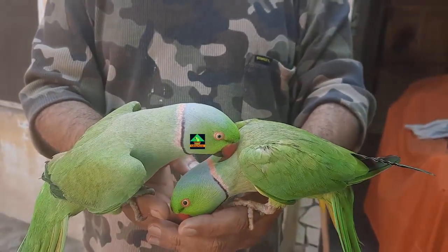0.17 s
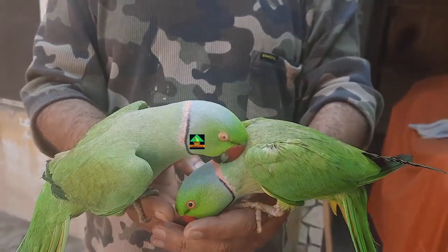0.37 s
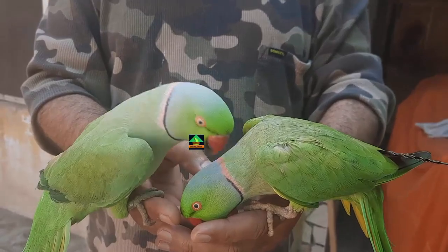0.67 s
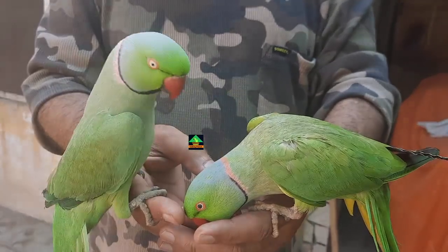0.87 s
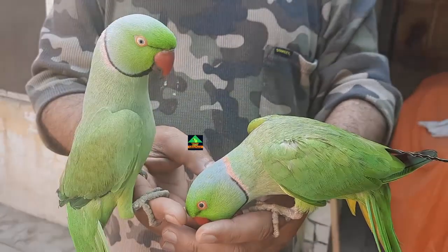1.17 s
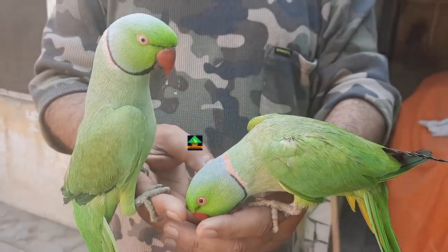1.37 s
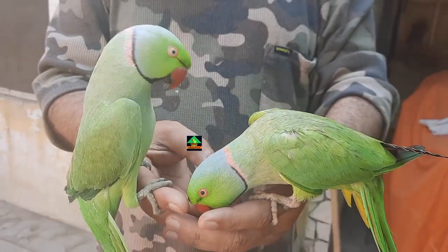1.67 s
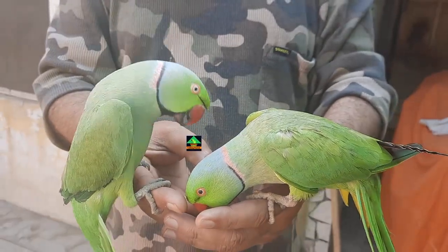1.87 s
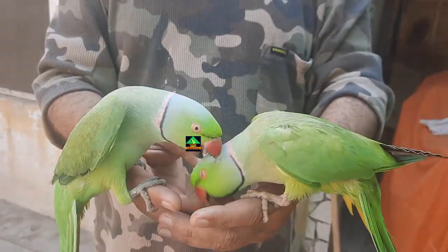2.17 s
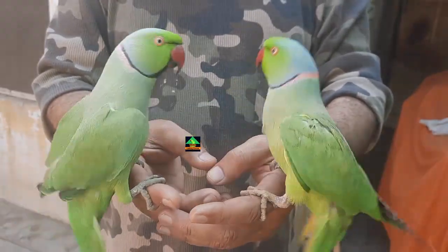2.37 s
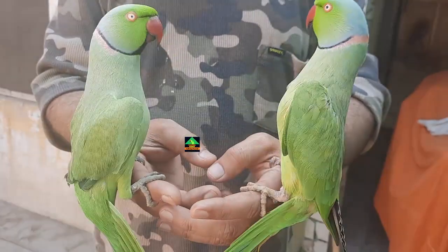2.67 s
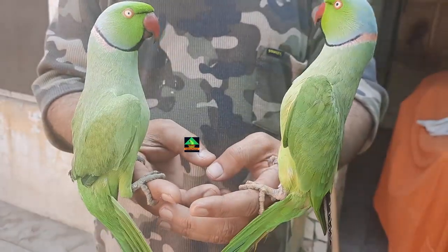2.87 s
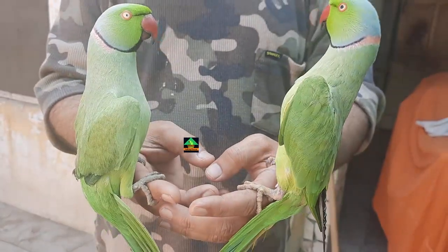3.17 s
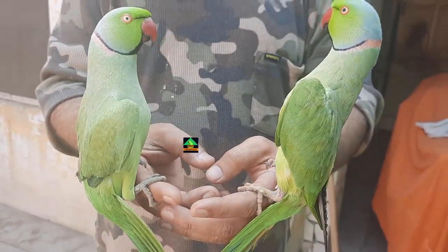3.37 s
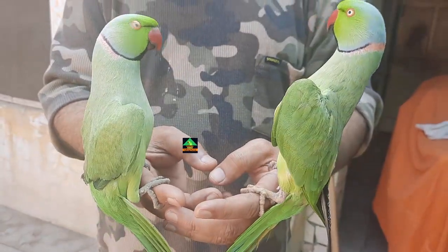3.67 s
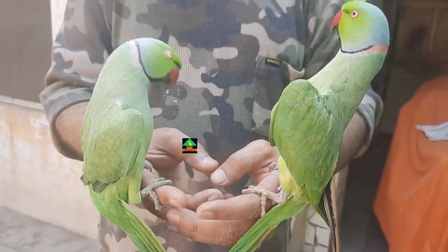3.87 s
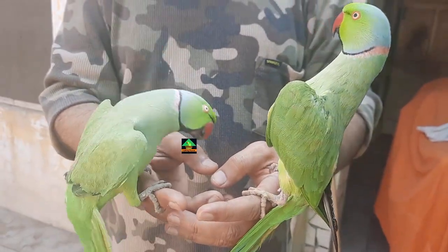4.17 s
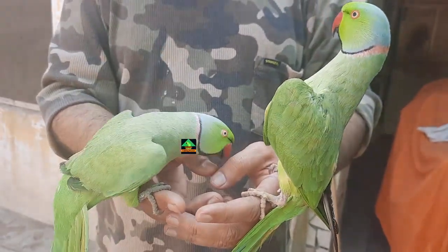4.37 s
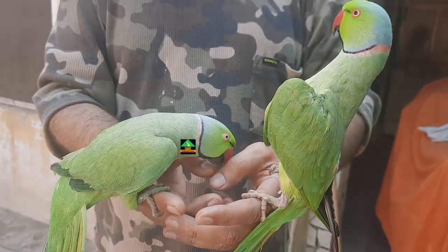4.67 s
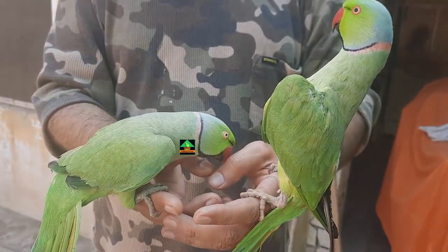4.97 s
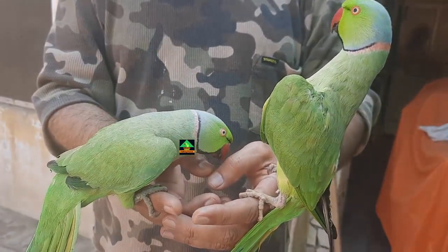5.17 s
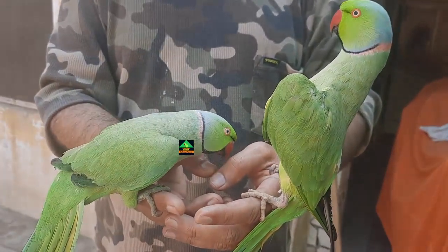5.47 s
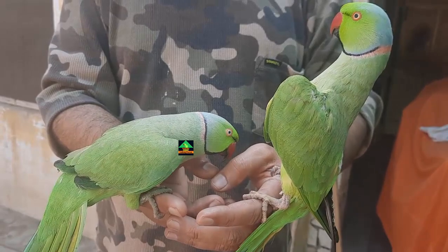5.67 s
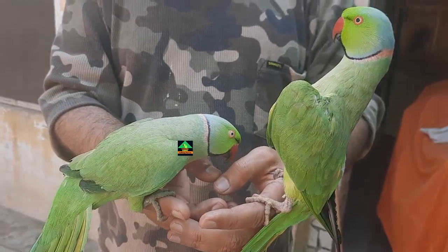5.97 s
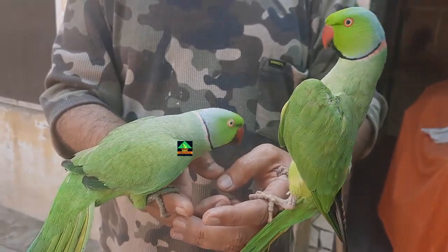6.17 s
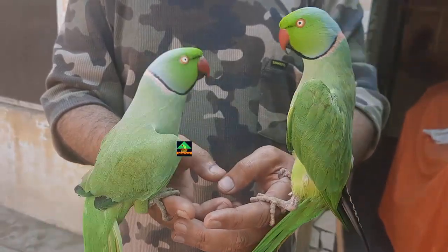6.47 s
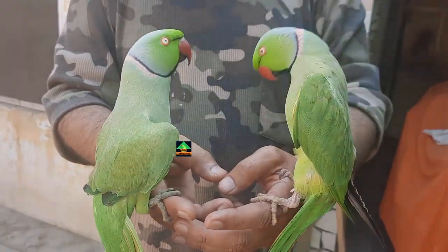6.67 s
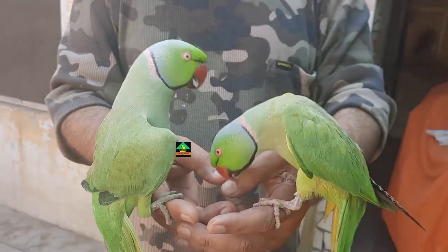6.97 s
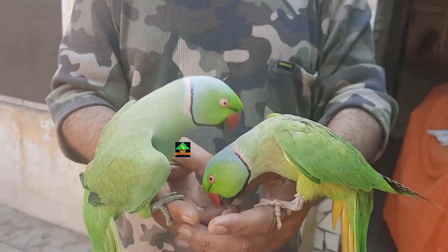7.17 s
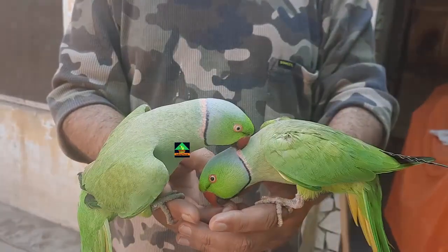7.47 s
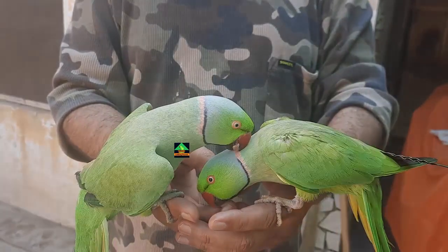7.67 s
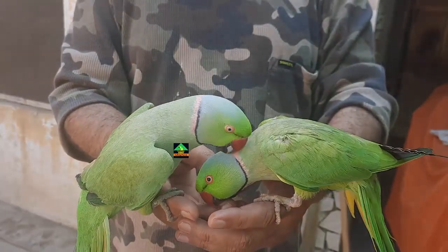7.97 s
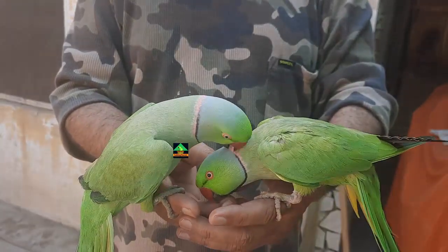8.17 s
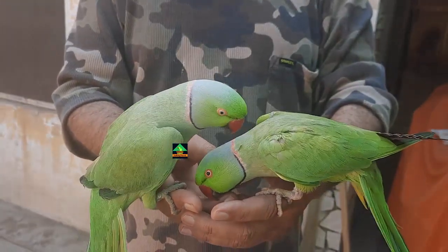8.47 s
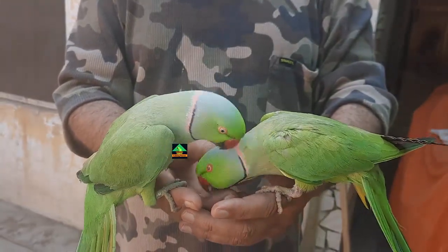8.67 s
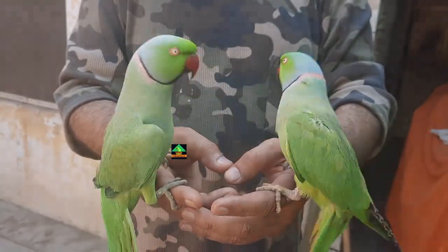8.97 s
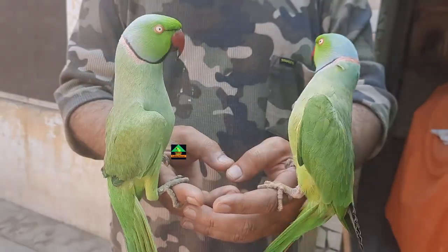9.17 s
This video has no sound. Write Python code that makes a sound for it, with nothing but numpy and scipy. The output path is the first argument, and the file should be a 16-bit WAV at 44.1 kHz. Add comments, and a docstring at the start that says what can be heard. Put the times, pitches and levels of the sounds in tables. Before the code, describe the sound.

A close stereo microphone in a small walled yard with short echoes. At 0 s a parakeet slightly left gives a level, piercing screech, then five harsh screeches from 0.4 to 2.0 s, about three per second, each scooping up and leaping higher at its end. From 2.2 to 3.1 s come only faint chirps, a thin peep, a scratchy mutter and clucks. Traffic rumble swells around 3.4 s and stays, with an uneven engine hum; a faint far horn flutters at 3.5-4.4 s. Clucks near 4 s and a brief purr precede sharp hisses and rough short squawks, 4.6-5.9 s, with a whistle at 4.9. From 5.4 s to the end, a farther bird on the right repeats fourteen hoarse, falling, echoing screeches, over three per second. The engine revs around 7 s; clucks at 7.3-7.6, an arched whistle at 7.8-8.1 and yelps at 8.2-8.6 intervene.

```python
"""A level screech opens, then a run of rising screeches: one of two ring-necked parakeets that sit on
a man's hands close to the microphone, in a walled yard. Clucks, hisses, squawks and whistles follow.
A bird farther off to the right starts a long series of falling screeches. Traffic rumbles, a far horn sounds.
Cries are stacks of unsteady partials plus breath noise; whistles are near-pure tones; hisses and
traffic are coloured noise; the motor and horn are sums of wavering sines; random echoes make the yard."""
import sys
import numpy as np
from scipy import signal
from scipy.fft import rfft, irfft, next_fast_len
from scipy.io import wavfile

SR = 44100
rng = np.random.default_rng(int(sys.argv[2]) if len(sys.argv) > 2 else 0)


def store_wav(level_fs):
    """Save 16-bit WAV to argv[1]."""
    pcm = np.round(np.clip(np.atleast_2d(level_fs), -1, 1) * 32767)
    wavfile.write(sys.argv[1], SR, pcm.T.astype(np.int16))


N = 410571  # length of the scene in samples
EDGE_HZ = 15900  # no partials above this, and the recorder's band limit

# The rising screeches. Each row: start in seconds, gain in dB.
RISING_CALLS = [(.394, 0.5), (.738, -1), (1.085, -1.5), (1.448, -3), (1.813, -1.5)]
# How throat and beak colour them. Each row: frequency in Hz, strength in dB.
RISING_THROAT = [(400, 0.5), (700, -4), (1100, -9), (2000, -8), (2900, -4), (3900, 2), (4600, -4),
                 (5400, -0.5), (6400, -15), (7800, -12.5), (9500, -25.5), (15500, -21)]
# The low growl under each one's leap is coloured differently. Each row: frequency in Hz, strength in dB.
GROWL_COLOUR = [(200, -5), (450, 25), (800, -17.5), (1300, -40), (3000, -30.5), (15500, -64.5)]


def rising_screeches():
    """The near bird's screeches, each with a short, sinking growl under its final leap."""
    growl = note(start_s=.15, length_s=.066, db=-39, first_hz=729, middle_hz=539, last_hz=461,
                 attack_s=.05, release_s=0.0098, rasp=0.22)
    screeches = series(RISING_CALLS, rising_course(), RISING_THROAT, jitter=.017, jitter_hz=400, shimmer_db=1.5,
                       second_db=5.0, doubling=0.3, fray=.4, patchy_db=5.5, attack_s=0.021)
    return screeches + series(RISING_CALLS, growl, GROWL_COLOUR, jitter=0.04, jitter_hz=200,
                              shimmer_db=8.0, attack_s=0.0088)


RISE_LENGTH_S, RISE_RELEASE_S = 0.23, 0.03
RISE_HZ, CREEP_HZ_PER_S = 850, 2300
SCOOP_HZ, SCOOP_S = 274.4, .025  # how far below it begins, and how fast it catches up
LEAP_HZ, LEAP_AT_S, LEAP_S = 945, .168, .017
RISE_DB, RISE_DB_PER_OCTAVE = -23.5, 11  # louder as the pitch climbs
RISE_RASP, LEAP_RASP = 0.053, 0.066  # share of breath noise, and what the leap adds
HARSH_AT_S, HARSH_S = 0.14, .04  # the syrinx rasps most just as the leap begins


def rising_course():
    """A screech scoops up to pitch, creeps higher, then leaps nearly an octave: (s, Hz, dB, rasp 0-1)."""
    t = np.arange(0, RISE_LENGTH_S, 1 / SR)
    scoop = SCOOP_HZ * np.exp(-t / SCOOP_S)
    hz = RISE_HZ + CREEP_HZ_PER_S * t - scoop + LEAP_HZ * step(t, LEAP_AT_S, LEAP_S)
    release_db = 2 * envelope_db(t, 1 / SR, RISE_RELEASE_S)
    db = RISE_DB + RISE_DB_PER_OCTAVE * np.log2(hz / RISE_HZ) + release_db
    return np.transpose([t, hz, db, RISE_RASP + LEAP_RASP * bump(t, HARSH_AT_S, HARSH_S)])


# The falling screeches. Each row: start in seconds, gain in dB, factor on pitch.
FALLING_CALLS = [(5.368, -2, 0.95), (5.611, -2.5, .91), (5.874, -1, 0.95), (6.146, -.5, 0.97),
                 (6.421, 0, 0.97), (6.693, 1.5, .96), (6.972, 3, 0.96), (7.263, 2.5, 0.96),
                 (7.571, 2.5, 0.98), (7.876, 2.5, 0.95), (8.174, 2, .99), (8.467, 0.5, 0.94),
                 (8.761, 1.5, .95), (9.060, 2.5, 0.95)]
# How throat and beak colour them. Each row: frequency in Hz, strength in dB.
FALLING_THROAT = [(600, 1.5), (1500, -1), (2500, -6.5), (3000, -1), (3600, 6), (4400, -1), (5300, -4.5),
                  (6300, -7), (8000, -10.5), (11000, -15.5), (15500, -23.5)]


def falling_screeches():
    """The farther bird's hoarse series: strong pitch jitter, and each partial frayed into a band."""
    return series(FALLING_CALLS, falling_course(), FALLING_THROAT, jitter=.028, jitter_hz=453, shimmer_db=7,
                  fray=.7, second_db=8, doubling=0.38, attack_s=.028)


FALL_LENGTH_S = .19
FALL_END_HZ, ARCH_HZ, ARCH_AT_S, ARCH_S = 1754, 1006, .054, .043  # before each call's pitch factor
FALL_DB, LOUDEST_AT_S, SWELL_DB_PER_S, FADE_DB_PER_S = -20, 0.11, 63, 219
FALL_RASP, CLEAR_RASP, CLEAR_AT_S, CLEAR_S = .75, .1, .083, .078  # share of breath noise


def falling_course():
    """A screech arches early and sinks back, hoarse at both ends: (s, Hz, dB, rasp 0-1)."""
    t = np.arange(0, FALL_LENGTH_S, 1 / SR)
    hz = FALL_END_HZ + ARCH_HZ * bump(t, ARCH_AT_S, ARCH_S)
    swell_db = SWELL_DB_PER_S * (t - LOUDEST_AT_S)
    fade_db = FADE_DB_PER_S * (LOUDEST_AT_S - t)
    rasp = FALL_RASP + (CLEAR_RASP - FALL_RASP) * bump(t, CLEAR_AT_S, CLEAR_S)
    return np.transpose([t, hz, FALL_DB + np.minimum(swell_db, fade_db), rasp])


# The squawks. Each row: start in seconds, gain in dB, factor on pitch, factor on length.
SQUAWK_CALLS = [(4.602, -11.5, 1, 0.85), (4.785, -3.5, 0.84, 0.83), (4.897, -10.5, 1.15, 0.7),
                (4.985, -0.5, 1.06, 0.86), (5.206, -0.5, 0.94, 0.82), (5.424, -0.5, 0.96, 0.9),
                (5.629, 0, 1.06, 0.91), (5.827, 0, 0.98, 0.84)]
# The yelps, shorter and higher. Each row: start in seconds, gain in dB, factor on pitch, factor on length.
YELP_CALLS = [(5.911, -14.5, 0.77, 0.67), (8.223, -2.5, 0.9, 0.67), (8.380, -5, 1.0, 0.88),
              (8.546, -4, 1.07, 0.97)]
# How throat and beak colour both. Each row: frequency in Hz, strength in dB.
SQUAWK_COLOUR = [(350, -9), (650, 8.5), (1200, -2.5), (2300, 5.5), (3500, 0), (5200, -4.5), (6400, -16.5),
                 (8000, -16), (10000, -18), (15500, -29)]


def squawks_and_yelps():
    """Short cries, each one push of effort that lifts pitch, level and rasp together."""
    squawk = push(length_s=.075, top_s=.045, first_hz=541, top_hz=1144, last_hz=533,
                  db=-19, slack_db=-11, rasp=.3, release_s=0.0029)
    yelp = push(length_s=.036, top_s=0.0125, first_hz=1114, top_hz=1700, last_hz=586,
                db=-15, slack_db=-2.5, rasp=.15, release_s=0.0055)
    squawks = series(SQUAWK_CALLS, squawk, SQUAWK_COLOUR, jitter=0.0396, jitter_hz=260, second_db=4.0,
                     shimmer_db=8, doubling=0.85, attack_s=0.0046)
    return squawks + series(YELP_CALLS, yelp, SQUAWK_COLOUR, jitter=0.037, jitter_hz=302,
                            shimmer_db=16, attack_s=0.001)


# How throat and beak colour the level screech. Each row: frequency in Hz, strength in dB.
LEVEL_COLOUR = [(450, -9), (1030, -9), (2060, -3.5), (3100, -12.5), (4100, -7.5), (5200, -2.5), (6200, -17),
                (8200, -19.5), (10000, -25.5), (15500, -24)]
# The darker colour of its falling voice and of the purr. Each row: frequency in Hz, strength in dB.
PURR_COLOUR = [(300, -9), (700, -6), (1100, -7.5), (1500, 0), (2100, -16), (3200, -26), (8000, -39),
               (15500, -47)]


def level_screech():
    """Both sides of the syrinx sound at once, one nearly steady and one falling."""
    out = np.zeros(N)
    steady = note(start_s=0, length_s=.173, db=-17.0, first_hz=976, middle_hz=1028, last_hz=1025,
                  attack_s=0.00062, release_s=0.033, rasp=0.049)
    under = note(start_s=.026, length_s=.114, db=-27.5, first_hz=800, middle_hz=544, last_hz=380,
                 attack_s=0.025, release_s=0.044, rasp=.02)
    add(out, *syrinx(steady, LEVEL_COLOUR, jitter=0.006, jitter_hz=200, shimmer_db=1.5, second_db=2))
    add(out, *syrinx(under, PURR_COLOUR, jitter=0.011, jitter_hz=199, shimmer_db=0))
    return out


def purr(start_s=4.34, length_s=.11, db=-28.0, rate_hz=85.0, beat_hz=560):
    """The throat opens in quick bursts, each a few beats of the membrane."""
    out = np.zeros(N)
    t = np.arange(0, length_s, 1 / SR)
    bursts = np.sin(np.pi * rate_hz * (t + 0.0014)) ** 4
    turns = np.cumsum(beat_hz * (1 + 0.11 * wobble(len(t), 150))) / SR
    beats = np.diff(np.floor(turns), prepend=0)  # one click per whole turn
    gain = gain_of(db + envelope_db(t, attack_s=0.011, release_s=0.058))
    add(out, start_s, gain * coloured(beats * bursts, PURR_COLOUR))
    return out


# Two long whistles, one level and one arched. Each row: time in seconds, pitch in Hz, level in dB.
LEVEL_CURVE = [(4.87, 1580, -37), (4.884, 1486, -28.5), (4.932, 1464, -23.5), (4.98, 1523, -17.5),
               (5.012, 1735, -21.5)]
ARCHED_CURVE = [(7.785, 1208, -49), (7.795, 1182, -37), (7.913, 1294, -26), (7.975, 1858, -28.5),
                (8.009, 1950, -26), (8.043, 1860, -30), (8.083, 1500, -21.5), (8.109, 1396, -23.5),
                (8.128, 1370, -59)]


def long_whistles():
    """Two drawn-out whistles that follow the curves above."""
    return whistles([LEVEL_CURVE, ARCHED_CURVE])


# The soft chirps. Each row: start in seconds, length in seconds, level in dB, first pitch in Hz,
# middle pitch in Hz, last pitch in Hz.
SOFT_CHIRPS = [(.295, 0.009, -26.5, 1850, 2490, 2900), (0.639, 0.055, -39.5, 2160, 2350, 1880),
               (2.251, 0.013, -40.5, 1775, 2210, 2500), (2.531, 0.12, -58.5, 1890, 2335, 2310),
               (2.805, 0.087, -56, 1930, 1560, 1730), (2.877, .03, -36, 1700, 2050, 2510),
               (3.003, .112, -35.5, 2107, 1940, 2320)]


def chirps():
    """Short, soft whistles; attack and release each take a quarter of the chirp."""
    courses = []
    for s, length, *voice in SOFT_CHIRPS:
        courses.append(note(s, length, *voice, attack_s=0.25 * length, release_s=0.25 * length))
    return whistles(courses)


def whistles(courses):
    """Nearly pure tones with two faint overtones, starting and stopping sharply."""
    out = np.zeros(N)
    for rows in courses:
        t, hz, db = played(rows)[:3]
        phase = 2 * np.pi * np.cumsum(hz * (1 + 0.0026 * wobble(len(t), 120))) / SR
        tone = np.sin(phase) + gain_of(-28) * np.sin(2 * phase) + gain_of(-25.5) * np.sin(3 * phase)
        gain = gain_of(db + envelope_db(t, attack_s=.004, release_s=.004))
        add(out, t[0], np.sqrt(2) * gain * tone)
    return out


# Hisses through the open beak, and the first two rows are tiny clicks of the beak. Each row: start in seconds,
# level in dB, length in seconds.
BEAK_HISSES = [(0.298, -49, .008), (2.252, -78, 0.0066), (4.596, -12.5, 0.057), (4.894, -17, 0.049),
               (5.193, -15.5, 0.037), (5.438, -19, 0.031), (5.664, -21, 0.055), (5.911, -18, 0.015),
               (8.382, -16.5, 0.015)]
# The colour of that air. Each row: frequency in Hz, relative strength in dB per Hz.
HISS_COLOUR = [(1180, -23.5), (2000, -37), (2660, -15), (2950, -22.5), (3630, -13), (4210, -16.5),
               (4920, -12), (5840, -13), (7840, -3.5), (8400, -8), (9490, -12.5), (10900, -14),
               (12400, -8.5), (14100, -16), (15800, -9)]


def hisses():
    """Noise of air rushing through the beak, and brief clicks of the beak: each starts suddenly, holds, then
    drops away."""
    out = np.zeros(N)
    for s, db, length in BEAK_HISSES:
        shape = [(0, -16), (length * 0.12, -2), (length * 0.62, 0), (length * 0.7, -6), (length, -20)]
        t, shape_db = played(shape)
        add(out, s, gain_of(db + shape_db) * coloured(rng.standard_normal(len(t)), HISS_COLOUR))
    return out


# The clucks. Each row: start in seconds, level in dB, length in seconds, pulse rate in Hz.
CLUCK_CALLS = [(2.76, -24.5, 0.0076, 1110), (2.912, -24, 0.0104, 1066), (3.915, -25.5, 0.015, 526),
               (4.121, -19.5, 0.029, 540), (7.301, -14.5, 0.015, 1073), (7.45, -13.5, 0.013, 1137),
               (7.607, -16, .014, 1053)]
# How throat and beak colour them. Each row: frequency in Hz, strength in dB.
CLUCK_COLOUR = [(300, -2.5), (600, -4), (1050, -6.5), (1500, -3), (2200, -6.5), (3000, -9.5), (4000, -10),
                (8000, -30), (15500, -40)]


def clucks():
    """A few slack beats of the membrane, swelling quickly and sagging in rate."""
    out = np.zeros(N)
    for s, db, length, hz in CLUCK_CALLS:
        rows = [(s, hz, db - 21, .2),
                (s + length * 0.26, hz, db, .2),
                (s + length * 0.44, hz * .95, db - 9.5, .2),
                (s + length, hz * 0.68, db - 32, .2)]
        add(out, *syrinx(rows, CLUCK_COLOUR, jitter=.03, jitter_hz=300, shimmer_db=2))
    return out


# Throat and beak colour of the peep, then of the mutter. Each row: frequency in Hz, strength in dB.
PEEP_COLOUR = [(2200, -7.5), (4400, -2), (6500, -14), (8600, -13), (11000, -23), (15500, -18)]
MUTTER_COLOUR = [(1200, -23), (2000, 5), (2700, 7), (3400, -14), (5000, -17), (8000, -24), (15500, -35)]


def peep_and_mutter():
    """A high, clean note, then a scratchy mutter with more breath and a shakier pitch."""
    out = np.zeros(N)
    clean = note(start_s=2.32, length_s=.086, db=-36.5, first_hz=2210, middle_hz=2134, last_hz=2025,
                 attack_s=0.0099, release_s=.01, rasp=.05)
    mutter = note(start_s=2.712, length_s=0.13, db=-42.5, first_hz=2780, middle_hz=2270, last_hz=1915,
                  attack_s=0.043, release_s=0.041, rasp=.2)
    add(out, *syrinx(clean, PEEP_COLOUR, jitter=0.0025, jitter_hz=199, shimmer_db=16))
    add(out, *syrinx(mutter, MUTTER_COLOUR, jitter=0.043, jitter_hz=250, shimmer_db=17))
    return out


# The rasp is brighter than the tone. Each row: frequency in Hz, strength in dB.
BREATH_COLOUR = [(300, -7), (1000, -7), (3000, 1), (6000, 6), (15500, 11)]


def syrinx(rows, throat, jitter, jitter_hz, shimmer_db, second_db=0, doubling=0, fray=0, patchy_db=4):
    """An unsteady membrane and the air it chops, both coloured by throat and beak."""
    t, hz, db, rasp = played(rows)
    rasp = np.clip(rasp, 0, 1)
    turns = np.cumsum(hz * (1 + jitter * wobble(len(t), jitter_hz))) / SR
    k = np.arange(1, int(EDGE_HZ / hz.min()) + 1)[:, None]  # partial numbers
    drift, flutter = drifts(t, .04, len(k)), drifts(t, .002, len(k))
    # the throat may be tuned to the second partial; the upper ones come and go
    partial_db = read(throat, k * hz) + second_db * (k == 2) + patchy_db * drift * (k > 2)
    weight = gain_of(partial_db) * (k * hz < EDGE_HZ)
    # fast flutter widens each partial into a hoarse band
    frayed = (1 + fray * flutter) / np.sqrt(1 + fray ** 2 / 2)
    partials = weight * frayed * np.cos(2 * np.pi * (k * turns + rng.random(k.shape)))
    tone = partials.sum(0) / np.sqrt((weight ** 2).sum(0) / 2)
    # strong and weak beats alternate
    tone *= 1 + doubling * np.sqrt(rasp) * wobble(len(t), 60) * np.cos(np.pi * turns)
    puffs = rng.standard_normal(len(t)) * (1 + 0.38 * np.cos(2 * np.pi * turns))
    air = coloured(coloured(puffs, throat), BREATH_COLOUR)
    # harsh parts also shake in strength
    shimmer = evened(gain_of(shimmer_db * np.sqrt(rasp) * np.tanh(wobble(len(t), 350))))
    return t[0], gain_of(db) * shimmer * (np.sqrt(1 - rasp) * tone + np.sqrt(rasp) * air)


def series(calls, course, throat, attack_s, **voice):
    """One kind of call, repeated at its own strength, pitch and length."""
    after, hz, db, rasp = np.transpose(course)

    def varied(s, gain_db, pitch=1, length=1):
        """The course of a single call."""
        return np.transpose([s + after * length, hz * pitch, db + gain_db, rasp])

    out = np.zeros(N)
    for row in calls:
        start, call = syrinx(varied(*row), throat, **voice)
        fade_in = np.minimum(np.arange(len(call)) / SR / attack_s, 1)
        add(out, start, call * fade_in)
    return out


def push(length_s, top_s, first_hz, top_hz, last_hz, db, slack_db, rasp, release_s):
    """The course of a short cry: pitch, level and rasp follow one push of effort."""
    t = np.arange(0, length_s, 1 / SR)
    effort = np.sin(np.pi * np.interp(t, [0, top_s, length_s], [0, .5, 1]))
    slack_hz = np.where(t < top_s, first_hz, last_hz)
    level = db + slack_db * (1 - effort) + envelope_db(t, 1 / SR, release_s)
    return np.transpose([t, slack_hz + (top_hz - slack_hz) * effort, level, rasp * effort])


def note(start_s, length_s, db, first_hz, middle_hz, last_hz, attack_s, release_s, rasp=0):
    """The course of a held note whose pitch bends in one smooth bow."""
    t = np.arange(0, length_s, 1 / SR)
    bow = np.polyfit([0, .5, 1], [first_hz, middle_hz, last_hz], 2)
    hz = np.polyval(bow, t / length_s)
    return np.transpose([start_s + t, hz, db + envelope_db(t, attack_s, release_s), np.full(len(t), rasp)])


# How strongly the motor's hum sounds at each multiple of its pitch. Each row: multiple, strength in dB.
HUM_PARTIALS = [(1, 8.5), (2, -10.5), (3, -15)]
MOTOR_START_S, MOTOR_ATTACK_S, MOTOR_DB = 3.05, 0.16, -42
IDLE_HZ, REV_HZ, REV_AT_S, REV_S = 101.65, 34, 6.92, .13  # REV_HZ is added when it speeds up
LEAVES_AT_S, LEAVE_DB_PER_S = 8.3, 11


def motor():
    """The uneven hum of one engine in the street: it arrives, idles, speeds up and leaves."""
    out = np.zeros(N)
    t = np.arange(MOTOR_START_S, N / SR, 1 / SR)
    hz = IDLE_HZ + REV_HZ * step(t, REV_AT_S, REV_S)
    leaving_db = LEAVE_DB_PER_S * np.maximum(t - LEAVES_AT_S, 0)
    db = MOTOR_DB - leaving_db + envelope_db(t, MOTOR_ATTACK_S, 1 / SR)
    phase = 2 * np.pi * np.cumsum(hz * (1 + 0.0472 * wobble(len(t), 24.8))) / SR
    hum = evened(sum(gain_of(partial_db) * np.sin(k * phase) for k, partial_db in HUM_PARTIALS))
    add(out, t[0], gain_of(db + 2.3 * wobble(len(t), 4.8)) * hum)
    return out * gain_of([[1.4], [-1.6]])  # a little louder on the left


# The shrill partials of the far horn. Each row: frequency in Hz, relative strength in dB.
HORN_PARTIALS = [(2290, -12), (2748, 5), (3206, 4.5), (3664, -14), (6870, -17.5), (8700, -18)]


def horn(start_s=3.5, length_s=0.95, db=-45, flutter_db=4.0):
    """A far horn, of which only the shrill partials carry, each fluttering."""
    out = np.zeros(N)
    t = np.arange(0, length_s, 1 / SR)
    seconds = np.cumsum(1 + 0.0084 * wobble(len(t), 76)) / SR  # shared pitch waver
    tone = sum(gain_of(line_db + flutter_db * wobble(len(t), 25)) * np.sin(2 * np.pi * hz * seconds)
               for hz, line_db in HORN_PARTIALS)
    add(out, start_s, gain_of(db + envelope_db(t, attack_s=0.11, release_s=0.25)) * evened(tone))
    return out


# Colours of the traffic's drone, engines and tyres. Each row: frequency in Hz, relative strength in dB
# (per Hz).
DRONE_SPECTRUM = [(15, -23), (30, -38), (45, -7), (60, -14), (90, -28.5), (200, -77.5)]
ENGINE_SPECTRUM = [(30, -35), (60, -3), (80, -3), (105, -0.5), (135, -4), (170, -8), (230, -18.5),
                   (305, -5.5), (400, -18.5), (600, -24.5), (1500, -64.5)]
TYRE_SPECTRUM = [(150, 1), (400, -4.5), (700, 3), (1200, -5), (2400, -6.5), (4000, -15), (8000, -21),
                 (15500, -31)]
# Single vehicles going by. Each row: time in seconds, half duration in seconds, gain of the drone in dB,
# gain of the engines in dB, gain of the tyres in dB.
VEHICLES = [(.3, 0.64, 7, 4.5, 7.5), (4.55, 0.4, 1, 0.5, .5), (7.2, 0.68, 4, 1.5, 1.5),
            (8.68, 0.39, 11, -1, -1.5)]
NEAR_AT_S, NEARING_S = 3.43, 0.17
# each layer: level in dB while far, gain in dB once near
DRONE_DB, ENGINES_DB, TYRES_DB = (-57, 10), (-46, 9), (-59, 11.5)


def street():
    """Traffic beyond the wall draws nearer once and stays: a deep drone, engines and tyres."""
    t = np.arange(N) / SR
    near = step(t, NEAR_AT_S, NEARING_S)
    passing = sum(np.outer(gains_db, bump(t, s, width)) for s, width, *gains_db in VEHICLES)
    approach = [far_db + gain_db * near for far_db, gain_db in (DRONE_DB, ENGINES_DB, TYRES_DB)]
    levels = gain_of(np.array(approach) + passing)
    layers = (street_noise(DRONE_SPECTRUM, flutter_db=0.5),
              street_noise(ENGINE_SPECTRUM, flutter_db=0.8),
              street_noise(TYRE_SPECTRUM, flutter_db=2.0))
    mix = sum(level * layer for level, layer in zip(levels, layers))
    return mix * gain_of([[1.4], [-1.6]])  # a little louder on the left


# How alike the street sounds left and right. Each row: frequency in Hz, likeness from 0 to 1.
STREET_LIKENESS = [(50, 0.88), (150, 0.94), (400, 0.67), (1000, 0.059), (4000, .2)]


def street_noise(colour, flutter_db):
    """Noise for two microphones, more alike in the bass."""
    size = next_fast_len(N)
    left, other = rfft(rng.standard_normal((2, size)))
    same = np.clip(read(STREET_LIKENESS, np.fft.rfftfreq(size, 1 / SR)), 0, 1)
    right = same * left + np.sqrt(1 - same ** 2) * other
    pair = irfft([left, right], size)[:, :N]
    return np.array([coloured(x, colour) for x in pair]) * gain_of(flutter_db * wobble(size, 10)[:N])


# How long the yard rings. Each row: frequency in Hz, time to fade by 60 dB in seconds.
YARD_FADE = [(200, 0.1), (2000, 0.48), (4500, 0.38), (8000, 0.35), (15000, 0.28)]


def yard():
    """Sparse random echoes: a quick cluster from nearby things and a tail from the walls."""
    size = SR // 2
    taps = rng.standard_normal((2, 2, size)) * (rng.random((2, 2, size)) < 4000 / SR)
    t = np.arange(size) / SR
    near = taps[0] * gain_of(-60 * t / 0.098) * (t > .001)
    # the tail fades at its own speed in each frequency band
    hz, frame_s, bands = signal.stft(taps[1] * (t > .008), SR, nperseg=256)
    fade = gain_of(-60 * frame_s / read(YARD_FADE, hz)[:, None])
    tail = signal.istft(bands * fade, SR, nperseg=256)[1][:, :size]
    return [x / np.linalg.norm(x, axis=1, keepdims=True) for x in (near, tail)]


def placed(x, left_db, lead_ms, direct_db, near_db, tail_db):
    """A source as the two microphones get it: louder and earlier on its side, with the yard's echoes."""
    near, tail = yard()
    size = next_fast_len(N + SR // 2)
    hz = np.fft.rfftfreq(size, 1 / SR)
    side = np.array([[.5], [-.5]])  # half the difference goes to each microphone
    direct = gain_of(direct_db + side * left_db) * np.exp(2j * np.pi * hz * side * lead_ms / 1000)
    echoes = rfft(gain_of(near_db) * near + gain_of(tail_db) * tail, size)
    return irfft(rfft(x, size) * (direct + echoes), size)[:, :N]


def gain_of(db):
    """Decibels to amplitude."""
    return 10 ** (np.asarray(db) / 20)


def evened(x):
    """Scales to rms 1."""
    return x / np.sqrt(np.mean(x ** 2) + 1e-20)


def read(points, hz):
    """Reads a spectrum table on a log-frequency axis."""
    f, value = np.transpose(points)
    return np.interp(np.log(hz + 1), np.log(f + 1), value)


def played(rows):
    """Sample times over a curve table, and each of its columns at those times."""
    s, *columns = np.transpose(rows)
    t = np.arange(s.min(), s.max(), 1 / SR)
    return [t] + [np.interp(t, s, c) for c in columns]


def add(mix, s, sound):
    """Mixes a sound in at time s."""
    part = mix[max(round(s * SR), 0):][:len(sound)]
    part += sound[:len(part)]


def coloured(x, colour):
    """Gives x a spectrum, at rms 1."""
    size = next_fast_len(len(x))
    gain = gain_of(read(colour, np.fft.rfftfreq(size, 1 / SR)))
    return evened(irfft(rfft(x, size) * gain, size)[:len(x)])


def wobble(size, rate_hz):
    """Smooth chance of rms 1, up to about the given rate."""
    hz = np.fft.rfftfreq(size, 1 / SR)
    return evened(irfft(rfft(rng.standard_normal(size)) / (1 + (hz / rate_hz) ** 2), size))


def drifts(t, step_s, count):
    """Several unrelated random curves that take a new value at every step."""
    knots = np.arange(t[0], t[-1] + step_s, step_s)
    return np.array([np.interp(t, knots, x) for x in rng.standard_normal((count, len(knots)))])


def step(t, at_s, width_s):
    """A smooth change from 0 to 1."""
    return .5 + .5 * np.tanh(.5 * (t - at_s) / width_s)


def bump(t, at_s, width_s):
    """A bell of height 1."""
    return np.exp(-((t - at_s) / width_s) ** 2)


def envelope_db(t, attack_s, release_s):
    """Attack, hold and release over the times t."""
    gain = np.minimum((t - t[0]) / attack_s, 1) * np.minimum((t[-1] - t) / release_s, 1)
    return 20 * np.log10(np.maximum(gain, 1e-3))


def scene():
    """The near bird turns its head between calls; the other screecher is mostly heard off the walls."""
    left = rising_screeches() + level_screech() + long_whistles() + clucks() + purr()
    birds = placed(left, left_db=8.0, lead_ms=.11, direct_db=-1.34, near_db=-10.0, tail_db=-22.5)
    birds += placed(chirps(), left_db=7, lead_ms=.11, direct_db=-0.5, near_db=-7.5, tail_db=-10)
    birds += placed(squawks_and_yelps() + hisses(), left_db=5, lead_ms=0.027,
                    direct_db=-0.5, near_db=-6.5, tail_db=-19.5)
    # negative side settings put these on the right
    birds += placed(falling_screeches() + peep_and_mutter(), left_db=-6.0, lead_ms=-0.489,
                    direct_db=-4.0, near_db=-4, tail_db=-6.5)
    far = placed(horn(), left_db=5, lead_ms=.1, direct_db=-7, near_db=-8, tail_db=0)
    return birds + street() + motor() + far


def record(dry):
    """The loudest peaks round off; then the recorder's band limit."""
    rounded = dry / (1 + (dry / .95) ** 8) ** (1 / 8)
    band_limit = signal.firwin(301, EDGE_HZ, window=("kaiser", 9), fs=SR)
    return signal.oaconvolve(rounded, band_limit[None], "same")


dry = scene()
out = record(dry)
store_wav(out)
```